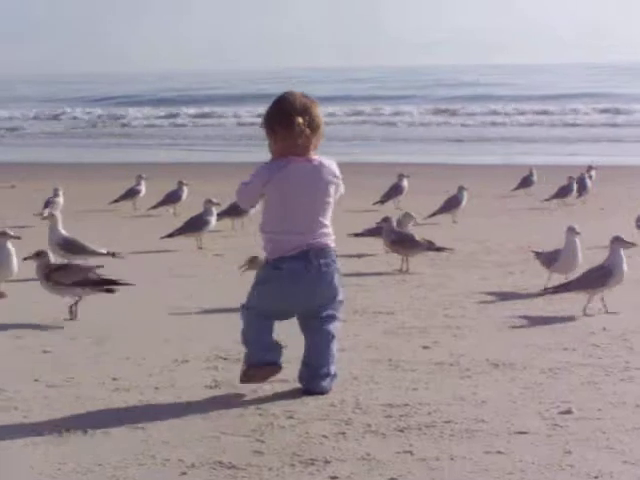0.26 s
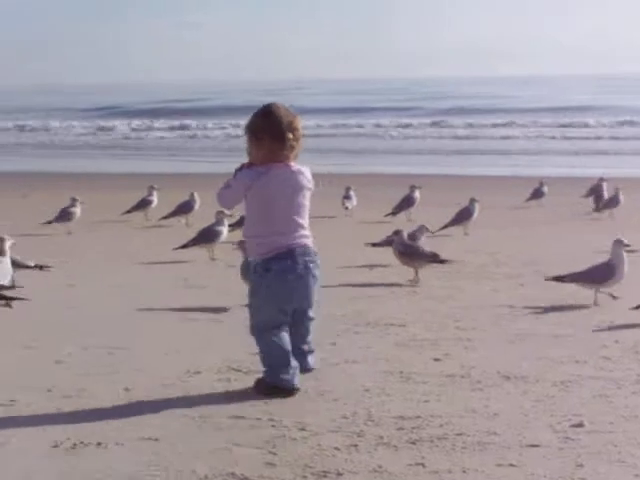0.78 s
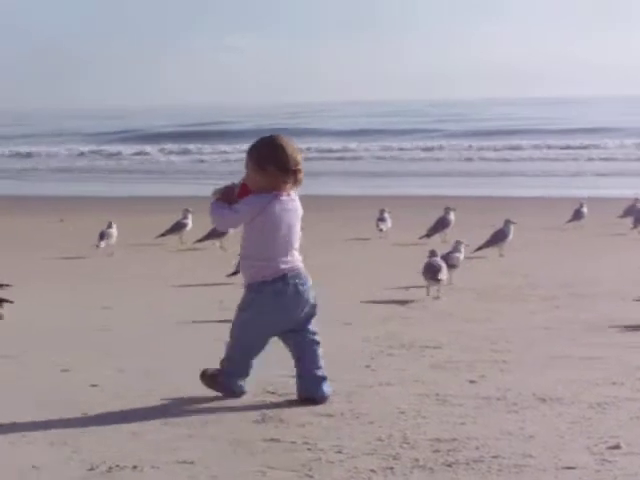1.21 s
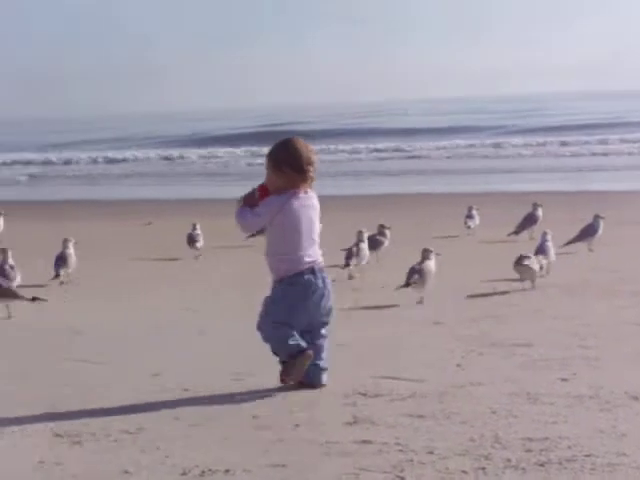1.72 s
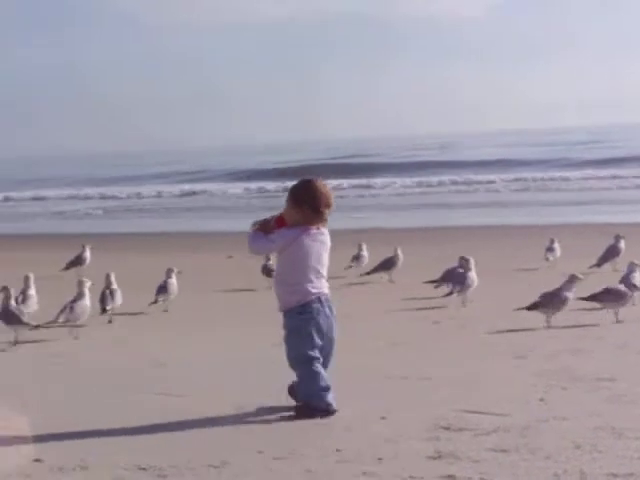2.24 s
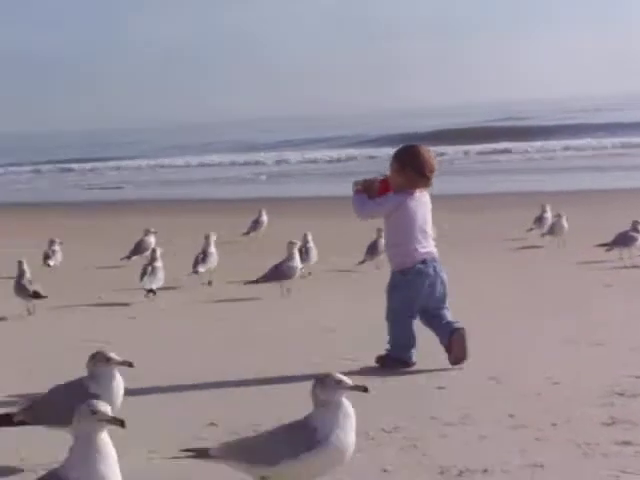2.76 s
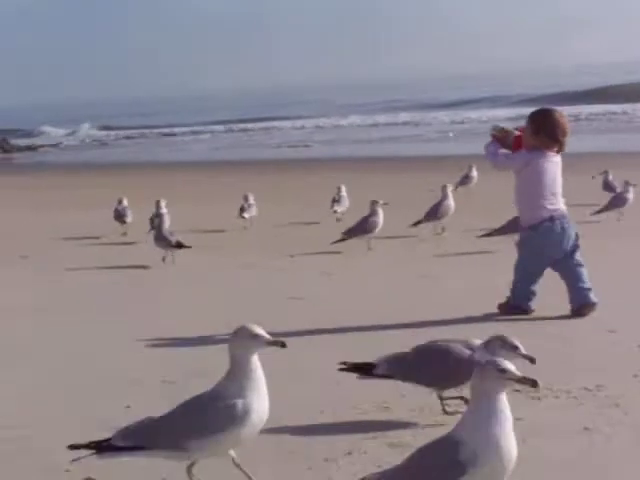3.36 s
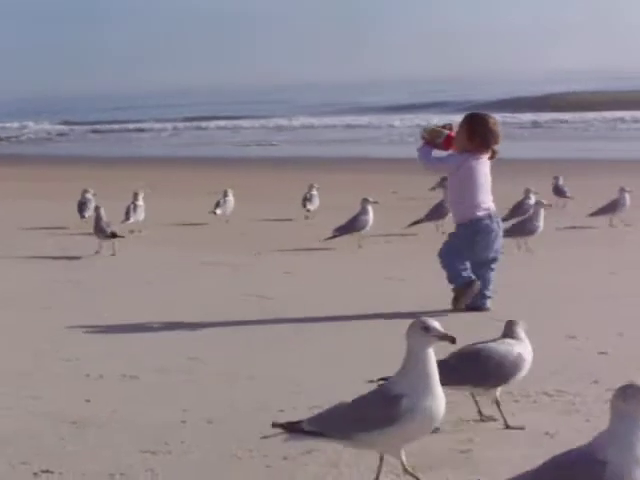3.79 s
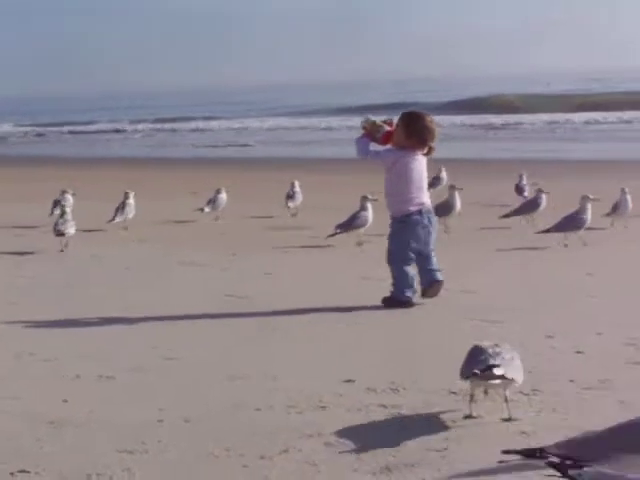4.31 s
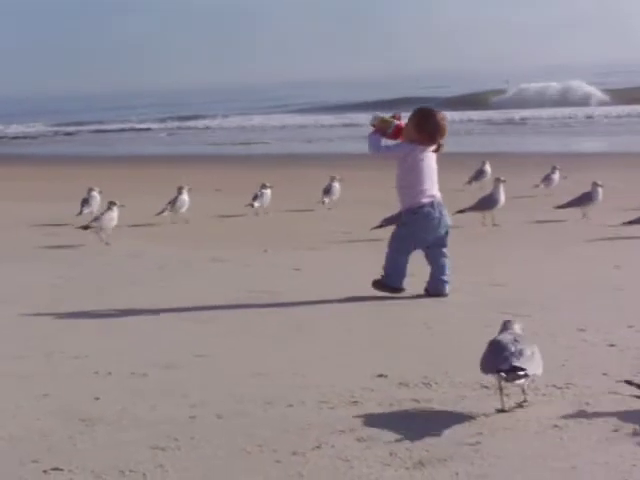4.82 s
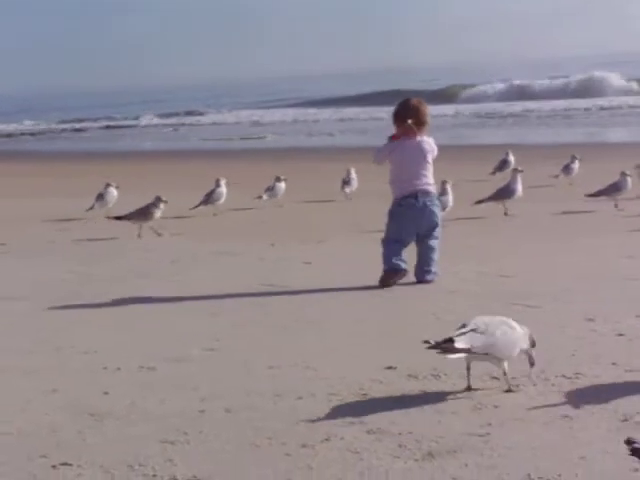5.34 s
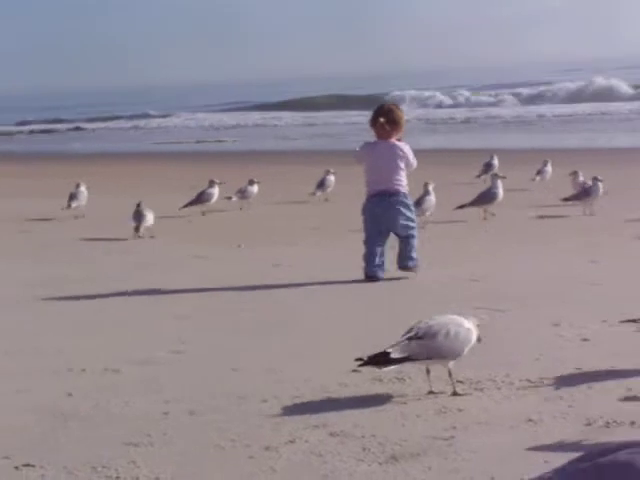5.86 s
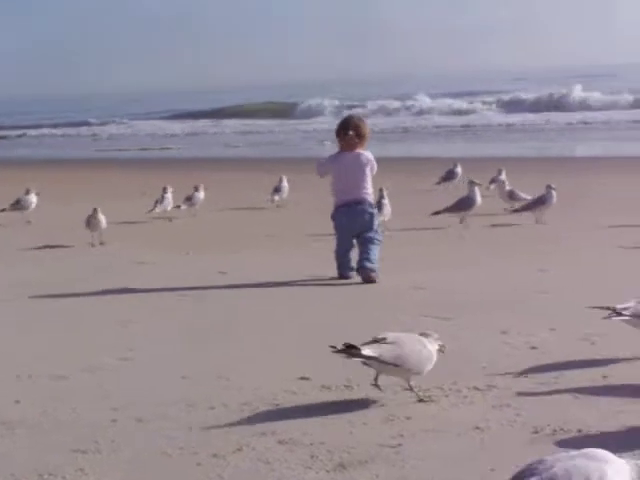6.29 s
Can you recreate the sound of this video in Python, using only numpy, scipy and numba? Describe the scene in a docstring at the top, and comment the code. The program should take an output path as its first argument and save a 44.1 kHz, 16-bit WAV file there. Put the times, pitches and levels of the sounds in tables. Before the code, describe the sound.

Silence until about 0.4 s, then surf and gulls switch on together. The surf is a steady, soft, low-weighted wash with slight flicker and no separate wave crashes. A distant flock forms a continuous shrill haze of tiny whistles, swelling with the near birds. From 0.4 to 2.5 s close gulls give short overlapping squeaks, nasal whistles and brief grating rasps, with hoarse fluttery calls near 1.0 and 1.3 s. At 2.7 to 3.4 s the cries become louder, with a rapidly dipping, yodelling squeal. A second, stronger warble at 3.7 to 4.1 s leads into the densest, most piercing clamour, until about 4.8 s. From 5 s calls are somewhat sparser: long squeals near 5.8 s, a lull around 6.2 s, and a last bright cry from 6.4 s. Small camera microphone outdoors: mono, limited treble, slight harshness, gain ducking at loud cries and lifting surf between.

```python
"""After a short silence, surf, a far flock and near gull voices start together on an open beach.
Surf is filtered noise; the far birds are many faint whistles in a haze of noise. Near birds are gliding
tones (whistled cries and some single harmonics of rasping voices), rasps of throat clicks, hoarse
flutters and, later, warbles. A small camera's gain control lifts the surf between the cries;
it samples at 16 kHz, so the highest tones fold back."""
import sys
import numpy as np
from scipy import signal
from scipy.fft import rfft, irfft, next_fast_len
from scipy.io import wavfile
from scipy.ndimage import uniform_filter1d
from numba import njit

SR = 44100
rng = np.random.default_rng(int(sys.argv[2]) if len(sys.argv) > 2 else 0)


def log_audio(samples):
    """Write samples as a 16-bit WAV file to the path given in sys.argv[1]."""
    # one column per channel
    frames = np.atleast_2d(samples).T
    # limit to full scale, then quantise
    limited = np.clip(frames, -1, 1)
    pcm = np.round(limited * 32767).astype(np.int16)
    wavfile.write(sys.argv[1], SR, pcm)


def boost_factor(decibels):
    """Convert a level in decibels to a linear amplitude factor."""
    exponent = np.asarray(decibels, float) / 20
    return 10 ** exponent


N = 289737
TIME = np.arange(N) / SR


def unit(x):
    """Scale to rms 1."""
    return x / np.sqrt(np.mean(x ** 2))


def walk(rate_hz, size):
    """Smooth random wander of spread near 1: random steps, averaged twice."""
    k = max(int(SR / rate_hz), 1)
    steps = np.repeat(rng.standard_normal(size // k + 1), k)
    return 1.3 * uniform_filter1d(uniform_filter1d(steps, k), k)[:size]


def colour(x, shape):
    """Filter a sound by (f/Hz, level/dB) points, joined along a logarithmic frequency scale."""
    hz, db = np.transpose(shape)
    size = next_fast_len(len(x))
    log_f = np.log(np.arange(size // 2 + 1) * SR / size + 1)
    gain = boost_factor(np.interp(log_f, np.log(hz), db))
    return irfft(rfft(x, size) * gain, size)[:len(x)]


def fade(size, rise_s, fall_s):
    """Soft edges for a sound of this many samples."""
    s = np.arange(size) / SR
    return np.clip(s / rise_s, 0, 1) * np.clip(s[::-1] / fall_s, 0, 1)


# How strong each pitch is in the surf noise: (f/Hz, level/dB per Hz)
SURF_COLOUR = [(25, -24), (80, 0.5), (250, 3), (600, 2), (1100, -7.5), (2500, -12.5), (6000, -22.5),
               (8000, -33.5)]


def surf():
    """Waves blur into a steady wash: noise, strongest in the lows, whose level flickers a little."""
    flicker = boost_factor(1.48 * walk(13, N))
    return boost_factor(-38.5) * unit(colour(rng.standard_normal(N) * flicker, SURF_COLOUR))


# How strong each pitch is in the blur of distant birds: (f/Hz, level/dB per Hz)
HAZE_COLOUR = [(1200, -7.5), (2200, -9.5), (3500, -1), (5000, -3), (6500, -1.5), (8000, -19)]


def haze():
    """Birds too far to tell apart: flickering noise in the pitch range of their cries."""
    flicker = boost_factor(3.5 * walk(18, N))
    return unit(colour(rng.standard_normal(N) * flicker, HAZE_COLOUR))


def whistle(rows, octave_db, waver=.0025, flutter_db=0.73, breath_db=-22):
    """One tone: a wavering near sine and its octave, in a skirt of breath noise; faint ones are rougher."""
    s, hz, db = np.transpose(rows)
    faint = np.clip((-18 - db.mean()) / 14, 0, 1)  # 0 strong .. 1 faint
    flutter_db = flutter_db * (1 + .6 * faint)
    breath_db = breath_db + 6 * faint
    a, b = int((s[0] - .004) * SR), int((s[-1] + 0.0028) * SR)
    t = np.arange(a, b) / SR
    wavering = 1 + waver * (1 + faint) * walk(60, b - a)
    pitch = uniform_filter1d(np.interp(t, s, hz), 200) * wavering
    phase = 2 * np.pi * (np.cumsum(pitch) / SR + rng.random())
    breathy = np.sin(phase) * (1 + boost_factor(breath_db) * walk(900, b - a))
    tone = breathy + boost_factor(octave_db) * np.sin(2 * phase)
    level = boost_factor(np.interp(t, s, db) + flutter_db * walk(61.2, b - a))
    # a sine of rms 1 peaks at the square root of 2
    return a, np.sqrt(2) * tone * level * fade(b - a, 0.0036, 0.0067)


def far_cries(count=600):
    """Faint random whistles from all over the flock; the hoarse ones throb at the throat's click rate."""
    out = np.zeros(N)
    for when, pitch, length, bend, near, hoarse in rng.random((count, 6)):
        start_s = when * (N / SR - .2) + .01
        end_s = start_s + 0.03 + 0.14 * length ** 2
        from_hz = 2000 + 3800 * pitch
        to_hz = from_hz * (1.05 - 0.09 * bend)
        db = -5 * near - 6 * (1 - pitch)
        rows = [(start_s, from_hz, db), (end_s, to_hz, db)]
        a, cry = whistle(rows, -10.0, waver=.006, flutter_db=6.5, breath_db=-6.5)
        t = TIME[:len(cry)]
        clicks = np.cos(2 * np.pi * (320 + 150 * near) * t * (1 + 1.5 * t))  # they quicken
        throb = np.exp(2.5 * hoarse ** 2 * clicks)
        out[a:a + len(cry)] += cry * unit(throb) * np.sqrt(np.hanning(len(cry)))
    return unit(out)


def flock(birds):
    """The far birds: whistles in a haze, both swelling when the near birds are loud."""
    window_s, follow = 0.18, 0.67
    far = boost_factor(-6) * haze() + far_cries()
    power = np.abs(uniform_filter1d(birds ** 2, int(window_s * SR)))
    uproar = np.sqrt(power) / boost_factor(-20)  # 1 when the near birds are at -20 dB
    return boost_factor(-37) * uproar ** follow * far


def glide(start, length, from_hz, to_hz, arch_hz, from_db, to_db):
    """Rows (t/s, f/Hz, level/dB) of a gliding tone: a straight glide with an arch on it."""
    u = np.linspace(0, 1, int(length * 400) + 3)
    arch = u * (1 - u ** 3.3)  # it peaks late, so that cries end in a hook
    pitch = from_hz + (to_hz - from_hz) * u + arch_hz * arch / arch.max()
    return np.transpose([start + length * u, pitch, from_db + (to_db - from_db) * u])


# Cries that break off downward: (start t/s, pitch at start f/Hz, drop f/Hz)
HOOKS = [(.984, 4210, 246), (1.02, 4780, 302), (3.027, 4210, 345), (4.233, 4330, 303), (4.595, 5700, 293.5),
         (5.753, 4910, 354)]


def break_off(rows):
    """Let the pitch of a listed cry fall ever faster over its last moments."""
    hook_s = 0.02
    for s, hz, drop_hz in HOOKS:
        if abs(s - rows[0, 0]) < .015 and abs(hz / rows[0, 1] - 1) < .05:
            left_s = rows[-1, 0] - rows[:, :1]
            rows = rows - [0, drop_hz, 0] * np.clip(1 - left_s / hook_s, 0, 1) ** 2
    return rows


# Octave above a tone, by pitch; strongest near 2300 Hz, weak in the lowest and highest tones:
# (pitch f/Hz, level/dB against the tone)
OCTAVE_BY_PITCH = [(1600, -48), (2300, -5), (2900, -13.5), (3300, -15), (3800, -26.5), (4400, -43),
                   (6000, -48.5)]
# Tones whose octave departs from that rule: (start t/s, pitch at start f/Hz, octave level/dB against the tone)
OCTAVES = [(.376, 3230, -4.5), (1.111, 2620, -24.5), (1.503, 3160, -25), (1.984, 2840, -5.5),
           (2.092, 3290, -4.5), (2.132, 4090, -6.5), (2.344, 2600, -24.5), (3.925, 3250, -32),
           (4.097, 3250, -35.5), (4.636, 3530, -4.5), (5.344, 4110, -15), (5.758, 3250, -32.5),
           (6.078, 3590, -37.5), (6.375, 3580, -37.5)]


def octave_level(rows):
    """Level of a tone's octave in dB: its own if listed, otherwise set by its mean pitch."""
    for s, hz, db in OCTAVES:
        if abs(s - rows[0, 0]) < .015 and abs(hz / rows[0, 1] - 1) < .1:
            return db
    return np.interp(np.mean(rows[:, 1]), *np.transpose(OCTAVE_BY_PITCH))


def sing(tones):
    """Sound the near birds' tones, each given as rows (t/s, f/Hz, level/dB), into one track."""
    out = np.zeros(N)
    for rows in tones:
        rows = break_off(rows)
        a, tone = whistle(rows, octave_level(rows))
        out[a:a + len(tone)] += tone[:N - a]
    return out


# Gliding tones of the near birds: whistled cries, and some single harmonics of their rasping voices:
# (start t/s, length t/s, pitch at start f/Hz, pitch at end f/Hz,
# arch f/Hz, level at start level/dB, level at end level/dB)
GLIDES = [(0.376, 0.19, 3193, 3244, -79, -25, -34), (0.496, 0.422, 3020, 2844, 91, -30, -29),
          (0.524, 0.374, 4565, 4350, 72.5, -29, -26), (0.588, 0.098, 3860, 3810, -49, -19, -13.5),
          (0.687, 0.053, 3560, 3380, -36, -19.5, -40), (0.67, 0.24, 4656, 4800, 167.5, -21, -34),
          (0.739, 0.134, 5850, 5550, 236.5, -28, -27.5), (0.901, 0.06, 2020, 2180, -39, -37.5, -32.5),
          (0.911, 0.045, 4040, 4160, 0.5, -32, -32), (1.299, 0.056, 3530, 3760, 37, -32.5, -37.5),
          (0.938, 0.051, 3342, 3433, -18, -19, -19.5), (0.984, 0.156, 4216, 4300, 20, -14, -16.5),
          (0.985, 0.041, 2774, 2474, -42.5, -31.5, -40.5), (1.029, 0.11, 4650, 4810, 106, -39, -23.5),
          (1.116, 0.18, 2600, 2776, 93.5, -32, -27.5), (1.218, 0.031, 4420, 4630, 5.5, -45.5, -27),
          (1.272, 0.022, 5950, 5430, -5, -29, -36.5), (1.286, 0.075, 3105, 3305, -14.5, -20.5, -32.5),
          (1.305, 0.08, 4700, 4910, -45, -30, -33.5), (1.323, 0.207, 4340, 4408, -2, -18, -12),
          (1.5, 0.055, 3154, 3040, 278, -28, -18.5), (1.525, 0.049, 1830, 1985, 17, -36, -34.5),
          (1.536, 0.055, 3770, 4000, 91.5, -20, -18), (1.55, 0.159, 4743, 4407, -130.0, -11.5, -21.5),
          (1.59, 0.152, 2824, 2774, 63, -25.5, -26.5), (1.675, 0.047, 3325, 3280, -11.5, -27.5, -29.5),
          (1.692, 0.15, 4400.0, 4110, 51.5, -31, -29), (1.713, 0.081, 3230, 3396, 7.5, -23, -24.5),
          (1.784, 0.1, 4490, 4360, 129, -16.5, -21), (1.845, 0.058, 3260, 2970, 238, -42, -31),
          (1.884, 0.016, 7010, 6170, 0.5, -32.5, -19), (1.927, 0.052, 1790, 2010, -10.5, -44.5, -35),
          (1.928, 0.058, 3580, 3844, 132.5, -34, -17.5), (1.988, 0.123, 2827, 2765, 79.5, -30.5, -28.5),
          (2.095, 0.04, 3260, 3330, 27, -26.5, -36), (2.128, 0.11, 4160, 3690, 281, -32, -38),
          (2.269, 0.065, 1673, 1837, -29, -40.5, -33.5), (2.316, 0.017, 5250, 5460, 1, -29, -14),
          (2.343, 0.082, 5255, 5730, -33, -18, -22.5), (2.344, 0.142, 2602, 2796, 154.5, -26.5, -25.5),
          (2.438, 0.057, 4830, 4760, 141.5, -23, -33.5), (2.442, 0.064, 1630, 1677, -6, -36, -36.5),
          (2.466, 0.075, 3450, 3190, -180.0, -22, -28.5), (2.513, 0.016, 4590, 4260, 0.5, -18.5, -28),
          (2.535, 0.112, 4255, 3370, -200.0, -12, -13.5), (2.555, 0.12, 4060, 4250, 174.5, -22.5, -21.5),
          (2.599, 0.041, 4220, 4230, 45.5, -35, -18), (2.656, 0.055, 4540, 4550, 63.5, -13, -28.5),
          (2.689, 0.059, 4955, 4960, 17.5, -19.5, -9.5), (2.723, 0.033, 5470, 5340, 280, -14, -12),
          (2.724, 0.03, 2910, 2784, -9, -29.5, -22), (2.752, 0.075, 5410, 5260, -0.5, -14, -21.5),
          (2.757, 0.03, 3900, 3440, -4.5, -23, -18.5), (2.758, 0.068, 4980, 4760, -280, -4.5, -7),
          (2.831, 0.18, 4480, 4570, -9.5, -22, -18), (2.859, 0.024, 1547, 1770, 2.5, -34, -27),
          (2.872, 0.11, 3265, 3230, 20.5, -30, -30), (2.896, 0.05, 4450, 4160, -37, -18.5, -19.5),
          (2.136, 0.04, 4600, 4750, -42, -33.5, -39.5), (3.023, 0.085, 3080, 3240, 21.5, -24, -30),
          (3.148, 0.02, 1894, 2050, 7, -31, -39.5), (3.262, 0.16, 5160, 4950, 15.5, -23.5, -26.5),
          (3.301, 0.05, 3600, 3640, 66, -27.5, -35), (2.871, 0.062, 3715, 3540, -56.5, -17, -18),
          (2.885, 0.05, 2334, 2144, -48, -26, -24), (2.946, 0.187, 2876, 2897, 119, -23.5, -25.5),
          (3.025, 0.137, 4200, 4584, 43.5, -24.5, -12), (3.03, 0.18, 6040, 5690, 159, -29.5, -28.5),
          (3.177, 0.092, 3736, 3780, -58.5, -28, -34.5), (3.264, 0.027, 1598, 1800, -2, -30.5, -30),
          (3.294, 0.19, 4260, 4390, 98.5, -23.5, -26), (3.414, 0.226, 6240, 5816, 407.5, -27.5, -18.5),
          (3.447, 0.12, 4940, 4830, -77, -31.5, -42), (3.427, 0.11, 3900, 3750, 60.5, -42.5, -40.5),
          (3.458, .018, 2200, 2080, -1, -45, -35), (3.485, .016, 1600, 1800, 1, -32.5, -36),
          (3.619, .022, 1550, 1766, -1, -35.5, -28.5), (3.68, 0.225, 4700, 4315, 62.5, -9.5, -20.5),
          (3.688, 0.18, 4230, 4464, 156.5, -13, -16), (3.715, 0.11, 3685, 3160, -53, -25.5, -19.5),
          (3.878, 0.041, 3287, 3480, -88.5, -12, -14.5), (3.895, 0.093, 5500, 5470, -140.0, -13, -9.5),
          (3.923, 0.1, 4340, 4500, 4, -21.5, -30), (3.926, 0.12, 3230, 3340, -1.5, -19.5, -22.5),
          (4.052, 0.03, 3320, 2880, 5, -14.5, -19.5), (4.099, 0.25, 5480, 4820, 154, -37, -28),
          (4.149, 0.061, 3620, 3910, 1.5, -27.5, -28.5), (3.962, 0.211, 6260, 5620.0, 457.5, -17, -21),
          (3.989, 0.017, 4300, 3970, 2.5, -4.5, -14.5), (4.041, 0.05, 4630, 4300, 247.5, -3, -7.5),
          (4.095, 0.037, 4800, 5080, -13.5, -21.5, -16), (4.096, 0.062, 3245, 3520, -28.5, -21, -18.5),
          (4.094, 0.143, 4190, 4330, 206.5, -12, -12.5), (4.156, 0.14, 4326, 3877, 152.5, -17, -18),
          (4.171, 0.064, 3185, 3225, 3, -24.5, -24.5), (4.231, 0.136, 4300, 4694, -130, -10.5, -7.5),
          (4.303, 0.098, 3250, 3510, 37.5, -17.5, -17.5), (4.402, 0.141, 3430, 3080, 252.5, -31, -17.5),
          (4.403, 0.014, 5430, 5570, -500, -13, -2.5), (4.432, 0.12, 5350, 5190, 0.5, -29.5, -17),
          (4.436, 0.12, 4830, 4970, 35, -28, -31.5), (4.49, 0.092, 2920, 3155, -48.5, -37.5, -23),
          (4.616, 0.015, 2690, 2700, -4, -27.5, -29.5), (4.616, 0.018, 4450, 4290, 2, -22.5, -22.5),
          (4.42, 0.176, 5870, 5790, 18.5, -4, -15), (4.423, 0.13, 4700, 4380, 98.5, -22.5, -30.5),
          (4.512, 0.06, 1983, 1873, 0, -31.5, -37.5), (4.521, 0.089, 6300.0, 5530, 345.5, -17, -16),
          (4.589, 0.155, 5720, 5910, -40, -23.5, -9.5), (4.638, 0.14, 3540, 3360, 14, -22.5, -33.5),
          (4.643, 0.059, 4810, 4840, -14.5, -33, -28), (4.664, 0.043, 5270, 5140, -20, -18.5, -31),
          (4.696, 0.074, 4220, 3970, 0, -27, -31), (4.751, 0.016, 5600, 4000, -350, -21, -5.5),
          (4.754, 0.1, 3296, 3340, 80.5, -14, -25), (4.834, 0.16, 4460, 4260, 166.5, -27.5, -40),
          (4.869, 0.06, 5680, 5406, 118, -18, -21.5), (4.873, 0.084, 3320, 3040, 299.5, -29, -13.5),
          (4.988, 0.015, 2600, 3055, -46, -35.5, -26), (5.004, 0.015, 3370, 3655, -5, -30, -23.5),
          (5.024, 0.015, 4500, 4780, 5, -17, -20), (5.036, 0.13, 5400, 5186, -1, -20.5, -26),
          (5.07, 0.125, 4490, 4670, -150.0, -18, -24.5), (5.099, 0.075, 2230, 2236, -16, -37, -34.5),
          (5.16, 0.037, 3417, 3173, 64, -18, -23), (5.196, 0.079, 5304, 5390, 152, -14.5, -16.5),
          (5.247, 0.088, 4665, 5105, -38.5, -21, -23.5), (5.28, 0.037, 4880.0, 4190, 255, -32, -30.5),
          (5.343, 0.122, 4130, 3940, 136.5, -36.5, -35), (5.364, 0.053, 5200, 5400, 65, -39.5, -21),
          (5.526, 0.037, 3280, 3440, -1, -39, -34.5), (5.527, 0.035, 2280, 2497, 47.5, -40.5, -28.5),
          (5.573, 0.114, 3465, 3560, -170.0, -20, -22.5), (5.657, 0.094, 3530, 3650, 86.5, -20, -15.5),
          (5.713, 0.04, 3100, 3410, 26, -22, -23.5), (5.335, 0.032, 5450, 5270, -5, -24.5, -40),
          (5.214, .04, 3130, 3300, 18.5, -35.5, -35), (5.345, 0.1, 2080, 2090, 42, -47, -48.5),
          (5.996, 0.13, 5000, 5130, 68, -30.5, -26.5), (6.179, 0.02, 3290, 3030, -3, -36.5, -29),
          (5.753, 0.362, 4903, 4736, 29, -15.5, -14.5), (5.756, 0.31, 4380, 4580, 153.5, -27.5, -23),
          (5.757, 0.14, 3284, 3495, -13, -25, -34.5), (5.887, 0.17, 3490, 3290, 3.5, -33.5, -49.5),
          (5.889, 0.071, 4190, 3750, -10.5, -36.5, -24), (5.975, 0.14, 4210, 4410, 1, -32.5, -24.5),
          (6.074, 0.035, 3530, 3030, 147, -24, -13.5), (6.11, 0.073, 4415, 4500, -5.5, -24, -23),
          (6.173, 0.023, 4480, 4170, 3, -27.5, -39.5), (6.353, 0.022, 4620, 5100, 3, -15, -20.5),
          (6.375, 0.051, 3577, 3720, -56, -21, -19.5), (6.378, 0.24, 3286, 3570, 22, -33, -21.5),
          (6.427, 0.19, 5014, 4940, 140, -13.5, -10.5)]


def gliding_tones():
    """Near birds' whistled cries, and some single harmonics of their rasping voices, as gliding tones."""
    return sing([glide(*row) for row in GLIDES])


def click(hz, ring_s):
    """One throat click: a brief ring with a soft start, so its band is steep on both sides."""
    t = TIME[:200]
    return (t / ring_s) ** 2 * np.exp(-t / ring_s) * np.sin(2 * np.pi * hz * t)


def resonate(x, hz, width_hz):
    """Two-pole resonance: favours the pitches around one frequency."""
    return signal.lfilter(*signal.iirpeak(hz, hz / width_hz, fs=SR), x)


# Rasps: (start t/s, length t/s, click rate halfway f/Hz, throat resonance halfway f/Hz, level/dB)
RASPS = [(0.422, 0.016, 345, 4860, -23), (0.462, 0.037, 353, 3480, -23.5), (0.612, 0.072, 335, 5820, -34.5),
         (0.891, 0.023, 337.7, 4130, -26), (1.245, 0.062, 326.3, 4220, -21),
         (1.669, 0.068, 342.4, 4180, -24), (1.939, 0.23, 149.2, 2420, -44.5),
         (2.038, 0.082, 339, 4360, -33.5), (2.255, .067, 335, 4530, -41.5), (2.412, .067, 366, 4080, -26),
         (2.635, 0.047, 459, 4980, -20), (2.691, 0.07, 363.5, 4450, -26.5),
         (2.827, 0.046, 391, 3100, -25.5), (3.101, 0.1, 373.6, 3910, -26.5),
         (3.243, 0.14, 437, 2060, -33.5), (3.608, 0.036, 331, 4560, -21.5), (3.629, 0.07, 406, 4930, -12.5),
         (3.642, 0.04, 303, 4060, -17.5), (3.783, 0.05, 380, 4670, -22), (4.059, 0.032, 380, 3900, -25),
         (4.498, 0.034, 388.5, 4650, -17.5), (3.992, 0.06, 345.4, 3750, -22),
         (4.264, 0.055, 385, 3150, -25), (4.36, 0.033, 357.3, 5010, -7.5), (4.568, 0.06, 415, 3180, -25.5),
         (4.709, 0.047, 408.6, 3170, -26), (4.763, 0.018, 395, 4330, -12.5),
         (4.918, .095, 367, 5600, -29.5), (4.986, 0.051, 373, 3280, -28.5), (5.518, 0.036, 345, 4000, -28),
         (5.616, 0.064, 372.4, 4460, -23.5), (5.661, 0.056, 352, 3300, -34),
         (6.095, .043, 367, 3470, -24.5), (6.296, 0.074, 355.6, 4500, -25)]


def rasps(jitter=.015, scatter_db=2.5, lower_db=-7, hiss_db=-20):
    """Throat clicks quicken as the beak moves their resonance up; breath hisses through the same throat."""
    throat_rise = 0.2  # share by which the resonance climbs through a rasp
    out = np.zeros(N)
    for start, length, rate_hz, middle_hz, db in RASPS:
        a, size = int(start * SR), int(length * SR)
        along = np.arange(size) / size
        rate = rate_hz * (.83 + .34 * along) * (1 + jitter * walk(300, size))
        phase = np.cumsum(rate) / SR
        click_at = np.flatnonzero(np.diff(np.floor(phase)))  # one click a cycle
        rasp = np.zeros(size + 200)
        chance = rng.standard_normal((64, 2))
        for i, (size_z, pitch_z) in zip(click_at, chance):
            hz = middle_hz * (1 + throat_rise * (along[i] - .5)) * (1 + .03 * pitch_z)
            ring = click(hz, .00019) - boost_factor(lower_db) * click(.7 * hz, .00028)
            rasp[i:i + 200] += boost_factor(scatter_db * size_z) * ring
        breath = rng.standard_normal(size)
        hiss = resonate(resonate(breath, middle_hz, 2500), middle_hz, 2500)
        rasp = unit(rasp[:size]) + boost_factor(hiss_db) * unit(hiss)
        out[a:a + size] += boost_factor(db) * rasp * fade(size, .3 * size / SR, .35 * size / SR)
    return out


# Hoarse fluttering cries: (start t/s, length t/s, pitch f/Hz, puff rate f/Hz, level/dB)
FLUTTERS = [(1.02, .125, 3140, 75, -32), (1.332, 0.12, 3203, 70, -32.5)]


def flutters():
    """Hoarse whistles, a narrow band of wandering pitch, chopped into uneven puffs."""
    out = np.zeros(N)
    for start, length, hz, rate_hz, db in FLUTTERS:
        a, size = int(start * SR), int(length * SR)
        pitch = hz * (1 + 0.026 * walk(rate_hz, size))
        band = np.sin(2 * np.pi * np.cumsum(pitch) / SR)
        puff_rate = rate_hz * (1 + 0.49 * walk(rate_hz, size))
        puffs = 1 + np.sin(2 * np.pi * np.cumsum(puff_rate) / SR)
        out[a:a + size] += boost_factor(db) * unit(band * puffs) * fade(size, 0.011, .01)
    return out


def warble(drops):
    """Rows (t/s, f/Hz, level/dB) of a warble: sudden drops, loudest at the bottom, then climbs."""
    drop_s, climb_s, top_softer_db = 0.0094, 0.02, 5.5
    rows = []
    for (at, top_hz, low_hz, db), after in zip(drops, drops[1:] + [None]):
        rows += [(at, top_hz, db - top_softer_db), (at + drop_s, low_hz, db)]
        climbed = at + drop_s + climb_s
        if after and after[0] > climbed:  # most of the climb comes early
            rows.append((climbed, low_hz + 0.68 * (after[1] - low_hz), db - top_softer_db / 2))
    return np.array(rows)


# Warbled cries, one list each, a row per drop:
# (t/s, pitch before the drop f/Hz, pitch after it f/Hz, level at the bottom level/dB)
WARBLES = [
    [(2.825, 5600, 5690, -12.5), (2.89, 5730, 5760, -5.5), (2.936, 6130, 5540, -6.5),
     (2.985, 5940, 5520, -9.5), (3.036, 5955, 5200, -17), (3.09, 5880, 5460, -13), (3.155, 5600, 5150, -17),
     (3.222, 5570, 5130, -10.5), (3.282, 5540, 5190, -8.5), (3.346, 5800, 5360, -6.5),
     (3.387, 5560, 5230, -4)],
    [(3.705, 5900, 5850, -8), (3.724, 5850, 5500, -7.5), (3.785, 5870, 5580, -6.5), (3.842, 5890, 5485, -5),
     (3.9, 5920, 5630, -1.5), (3.96, 5960, 5200, -1.5), (4.022, 6000, 5110, -2.5)],
]


def warbled_cries():
    """Near birds whose whistle drops suddenly and climbs back, again and again."""
    return sing([warble(drops) for drops in WARBLES])


def scattered(birds):
    """Sand and bodies scatter the near birds' sound: a short dying tail of noise follows it."""
    size = int(.2 * SR)
    tail = rng.standard_normal(size) * np.exp(-TIME[:size] / .04)
    return boost_factor(-17) * signal.fftconvolve(birds, tail / np.linalg.norm(tail))[:N]


def scene():
    """Near birds, their scattered sound, surf and far flock; silence before the start."""
    start_s, rise_s = .374, 0.004
    birds = gliding_tones() + rasps() + flutters() + warbled_cries()
    beach = surf() + flock(birds)
    opening = np.clip((TIME - start_s) / rise_s, 0, 1)
    return ((birds + scattered(birds) + beach) * opening)[None]


@njit
def ride(x, top, down, up, gain, most):
    """Gain falls while peaks pass the top and creeps back up otherwise; it rests in silence."""
    y = np.empty(len(x))
    for i in range(len(x)):
        y[i] = gain * x[i]
        if x[i] != 0:
            gain = gain * down if abs(y[i]) > top else min(gain * up, most)
    return y


def gain_control(x):
    """The camera turns itself down fast at loud peaks and up again slowly, within a limit."""
    top, first_db, most_db = 0.29, -9, 15
    attack_db_s, release_db_s = 1487, 57.5  # dB per second
    down, up = 1. * boost_factor(-attack_db_s / SR), 1. * boost_factor(release_db_s / SR)
    return ride(x, top, down, up, 1. * boost_factor(first_db), 1. * boost_factor(most_db))


def fold_back(heard):
    """Sampling mirrors the sound about half its rate; a filter then cuts what lies above that."""
    sampling_hz = 16000
    mirror = heard * 2 * np.cos(2 * np.pi * sampling_hz * TIME)
    return signal.sosfilt(signal.butter(14, 8000, fs=SR, output="sos"), heard + mirror)


def low_pass(x):
    """Removes everything above the highest recorded frequency."""
    return signal.sosfilt(signal.butter(12, 8900, fs=SR, output="sos"), x)


def record(dry):
    """The gain rides the peaks, which are rounded; the top is filtered and the rest of it folds back."""
    held = gain_control(dry[0])[None]
    rounded = .55 * np.tanh(held / .55)
    heard = signal.sosfilt(signal.butter(10, 7800, fs=SR, output="sos"), rounded)
    return low_pass(fold_back(heard))


dry = scene()
out = record(dry)
log_audio(out)
```